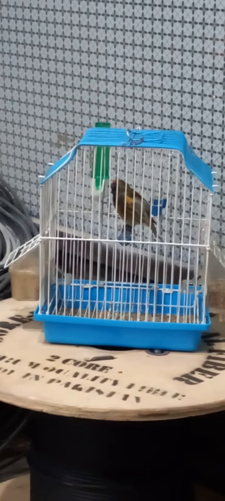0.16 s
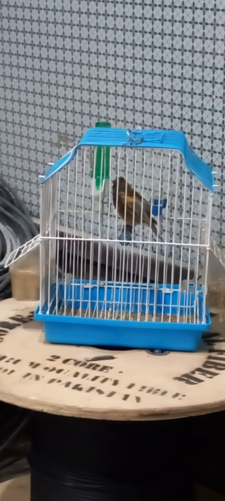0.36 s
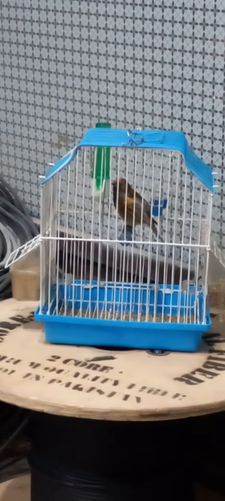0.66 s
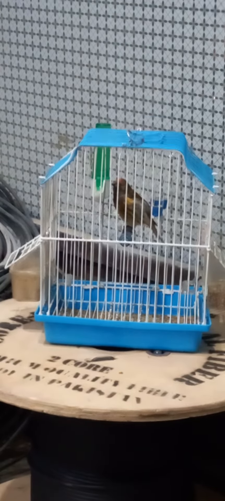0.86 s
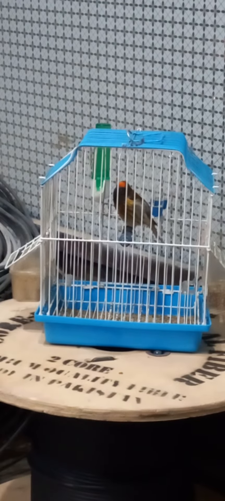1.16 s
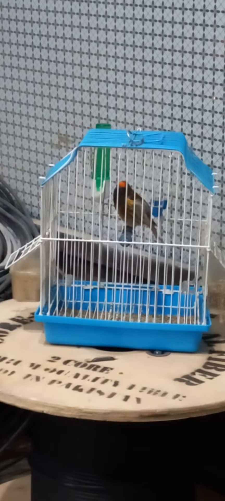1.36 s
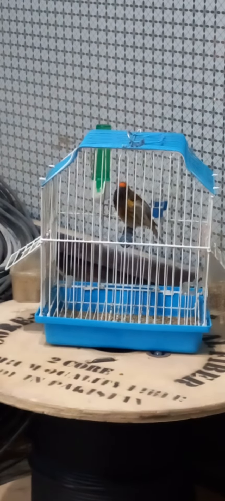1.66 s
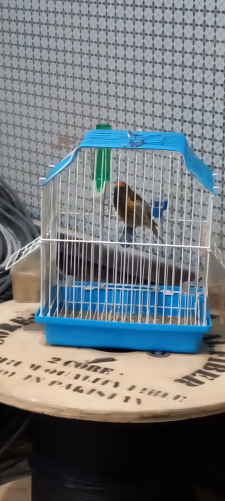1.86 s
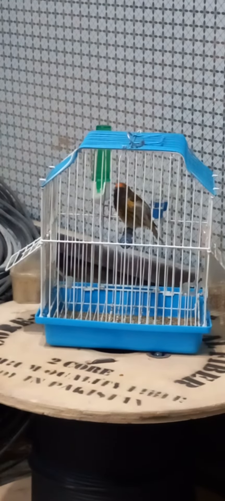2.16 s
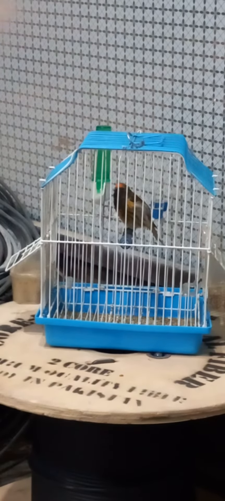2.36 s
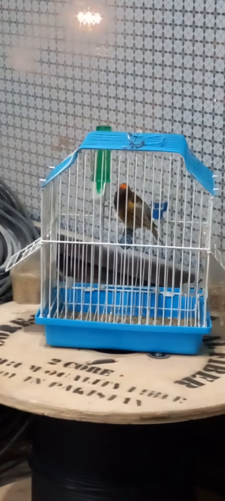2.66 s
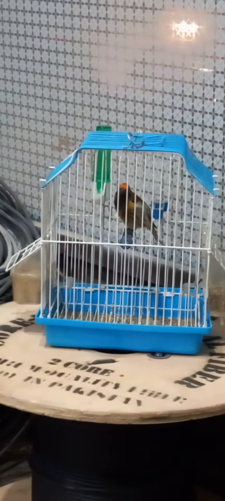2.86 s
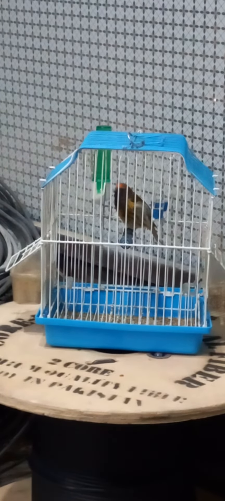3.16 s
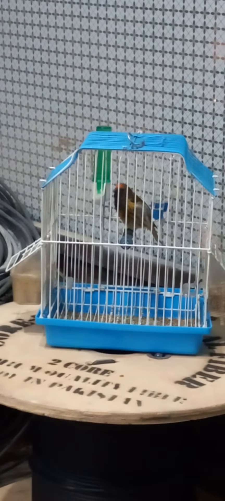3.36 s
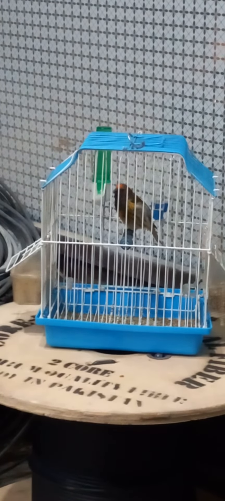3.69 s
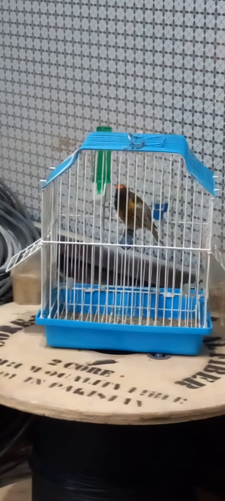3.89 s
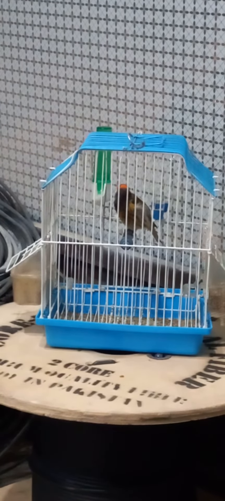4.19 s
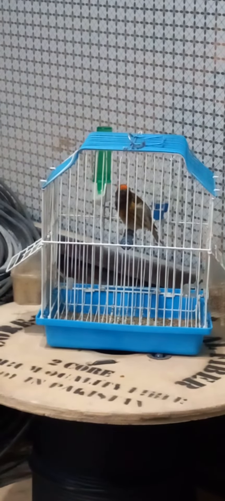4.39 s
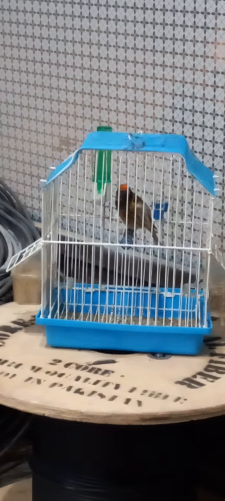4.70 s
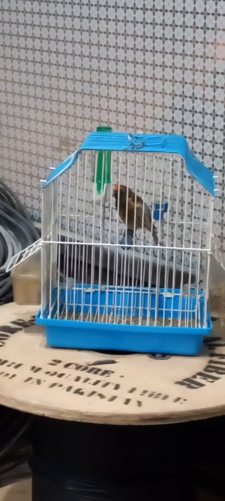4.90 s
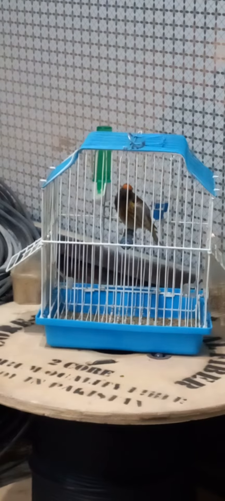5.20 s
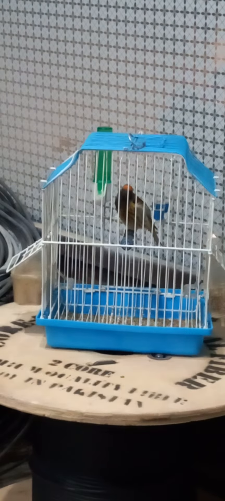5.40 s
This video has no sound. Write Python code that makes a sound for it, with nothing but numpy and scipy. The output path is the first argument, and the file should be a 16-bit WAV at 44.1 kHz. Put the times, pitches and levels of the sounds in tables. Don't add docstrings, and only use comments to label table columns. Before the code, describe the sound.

Close caged-bird twittering, fast and bright, with doubled whistles, chirps, buzzy ticks and squeaks, ringing in a hard-walled yard. Beneath it lie a quiet low traffic rumble, wavering engine tones and a soft airy hiss. The song thickens and gets louder until a pinched trill, ends at about four and a half seconds, then far birds call weakly. Stereo phone pickup, bird leaning right.

```python
import sys
import numpy as np
from scipy import signal
from scipy.fft import rfft, irfft, next_fast_len
from scipy.io import wavfile
from scipy.ndimage import uniform_filter1d, minimum_filter1d

SR = 44100
rng = np.random.default_rng(int(sys.argv[2]) if len(sys.argv) > 2 else 0)


def amplitude_ratio(level_db):
    exponent = np.asarray(level_db, float) / 20
    return 10 ** exponent


def unload_wav(signal):
    wavfile.write(
        sys.argv[1],
        SR,
        np.round(np.clip(np.atleast_2d(signal).T, -1, 1) * 32767).astype(np.int16),
    )


N = 244314


def rms_one(x):
    return x / np.sqrt(np.mean(x ** 2) + 1e-20)


def at_hz(points, hz):
    point_hz, value = np.array(points).T
    return np.interp(np.log(np.maximum(hz, 1)), np.log(point_hz), value)


def in_time(rows):
    s, *columns = np.transpose(rows)
    return [np.interp(np.arange(N) / SR, s, c) for c in columns]


def drift(rate_hz, size):
    r = np.exp(-2 * np.pi * rate_hz / SR)
    settle = 8000
    wander = signal.lfilter([1], [1, -2 * r, r * r], rng.standard_normal(size + settle))
    return rms_one(wander[settle:])


def coloured(x, spectrum):
    size = next_fast_len(x.shape[-1])
    hz = np.arange(size // 2 + 1) * SR / size
    return irfft(rfft(x, size) * amplitude_ratio(at_hz(spectrum, hz)), size)[..., :x.shape[-1]]


def band_noise(low_hz, high_hz, order, noise):
    return signal.sosfilt(signal.butter(order, [low_hz, high_hz], "band", fs=SR, output="sos"), noise)


# frequency in Hz, likeness from -1 to 1.
LIKENESS = [(60, .955), (180, .99), (550, .33), (1650, -.054), (4970, -.12), (15000, -.5)]


def stereo_noise(spectrum, low_hz, high_hz):
    size = next_fast_len(N)
    hz = np.arange(size // 2 + 1) * SR / size
    mid, side = rfft(rng.standard_normal((2, size)))
    alike = np.clip(at_hz(LIKENESS, hz), -1, 1)
    edges = np.sqrt((1 + (low_hz / (hz + 1)) ** 16) * (1 + (hz / high_hz) ** 16))
    band = amplitude_ratio(at_hz(spectrum, hz)) / edges
    ears = band * (np.sqrt(1 + alike) * mid + np.sqrt(1 - alike) * side * [[1], [-1]])
    return rms_one(irfft(ears, size)[:, :N])


def whistles(notes, rise_bend, fall_bend, swell, wobble, flutter_db):
    tones, overtones = np.zeros((2, N + SR))
    unsteady = np.array([drift(750, N + SR), drift(180, N + SR), drift(1900, N + SR)])
    for s, length, first_hz, last_hz, level_db, step_db in notes:
        at, size = round(s * SR), round(length * SR)
        q = np.linspace(0, 1, size)
        harsh = amplitude_ratio(min(step_db, 0))
        pitch, loud, rasp = unsteady[:, at:at + size]
        glide = 1 - (1 - q) ** rise_bend if last_hz > first_hz else q ** fall_bend
        hz = first_hz + (last_hz - first_hz) * glide
        hz = hz * (1 + wobble * (harsh / 2 + 0.089) * pitch)
        phase = 2 * np.pi * np.cumsum(hz) / SR
        flutter = flutter_db * (harsh / 2 + 1.01) * np.tanh(loud)
        shape = np.abs(np.sin(np.pi * q ** swell)) ** 0.58 * amplitude_ratio(level_db + flutter)
        tones[at:at + size] += shape * np.sin(phase)
        shape = shape * np.sqrt(np.abs(np.sin(np.pi * q)))
        shape = shape * (1 + 0.4 * harsh ** 2 * np.tanh(rasp))
        for k in range(2, 12 if step_db > -12 else 5):
            level = amplitude_ratio(min(step_db, 5) * (k - 1) - 0.82 * (k - 1) ** 2)
            below_top = k * hz < 0.4 * SR
            overtones[at:at + size] += shape * level * np.sin(k * phase + k * k) * below_top
    return tones[:N], overtones[:N]


# start in seconds, length in seconds, middle pitch in Hz, level in dB, step down to each overtone in dB.
LEVEL_NOTES = [(0, 0.012, 3550, -45, -19), (0, 0.03, 5494, -41.5, -14), (.344, 0.016, 3390, -40, -12.5),
               (.399, 0.02, 4286, -39.5, -28), (.592, 0.02, 4700, -46.5, -17),
               (.594, 0.035, 3576, -46.5, -8), (1.156, 0.025, 4600, -34.5, -40),
               (1.206, 0.031, 5270, -34, -15.5), (2.116, 0.027, 4424, -31, -27),
               (2.163, 0.017, 6780, -31, -6), (2.372, 0.029, 3603, -26, -48),
               (3.149, 0.039, 4944, -34, -35), (3.208, 0.029, 3846, -34.5, -18),
               (3.214, 0.03, 5500, -39, -21), (3.401, 0.054, 3180, -49.5, -30),
               (3.451, 0.02, 3680, -36, -9), (3.524, 0.028, 4288, -30, -39), (3.652, 0.017, 3650, -32, -30),
               (3.94, 0.034, 1413, -28, -26), (4.333, 0.018, 5720, -32, -33),
               (4.312, 0.0063, 6870, -36, -40), (4.458, 0.0093, 5090, -30, -17),
               (4.522, 0.022, 6220, -30, -33), (3.774, 0.0073, 3186, -32, -25),
               (3.78, 0.019, 3074, -26.5, -38), (3.72, 0.018, 2278, -38, -28),
               (4.76, 0.012, 3490, -49, -23)]
LIFTS = [(0, 0.012, 4940, -40, -27), (.206, 0.023, 3590, -39, -17), (.399, 0.054, 3760, -47.5, -15),
         (1.159, 0.04, 3580, -40.5, -11), (1.21, 0.019, 3405, -38.5, -22), (1.482, 0.046, 4720, -28, -37),
         (1.504, 0.034, 2860, -34.5, -37), (1.508, 0.016, 2337, -41.5, -3),
         (1.559, 0.021, 3485, -36.5, -36), (1.69, 0.027, 3960, -37.5, -31), (2.003, 0.021, 1480, -34.5, 2),
         (2.163, 0.037, 2640, -46.5, -7), (2.168, 0.015, 3444, -33.5, -19), (2.165, 0.033, 5355, -36, -27),
         (2.538, 0.024, 2710, -32, -15), (1.61, 0.024, 5184, -30, -11), (2.712, 0.019, 3045, -34.5, -34),
         (2.88, 0.028, 3630, -43.5, -6), (3.15, 0.021, 3780, -33.5, -40), (3.443, 0.029, 4750, -24, -47),
         (3.993, 0.018, 4200, -25.5, -7), (4.504, 0.017, 5875, -34, -20), (3.666, .036, 3952, -23.5, -37),
         (2.88, .022, 4950, -25.5, -32), (3.884, 0.029, 4627, -34, -13), (4.328, 0.051, 2865, -30, -15),
         (4.33, 0.012, 4076, -29, -30), (4.454, 0.018, 5940, -32.5, -19)]
RISES = [(.021, 0.028, 4506, -36, -23), (.654, 0.034, 5054, -30, -26), (.656, 0.023, 3940, -37, -16),
         (1.021, 0.038, 5200, -28, -22), (1.023, 0.027, 3993, -31.5, -20), (1.51, 0.029, 5090, -32, -35),
         (2.116, 0.029, 3520, -34.5, -14), (2.466, 0.019, 3970, -36.5, -23), (2.44, 0.024, 3670, -39, -30),
         (3.944, 0.017, 2630, -39, 6), (2.536, 0.036, 5140, -37.5, -27), (2.567, 0.0097, 5667, -28.5, -36),
         (3.717, 0.025, 6110, -32.5, -39), (2.873, 0.011, 4730, -34, -17), (2.934, 0.0402, 3710, -33, -47),
         (2.945, 0.034, 1830, -45.5, -25), (3.266, 0.019, 4400, -29, -17), (3.497, 0.022, 2896, -34, -34),
         (3.895, 0.015, 3590, -37.5, -20), (4.304, 0.017, 1844, -32, -8), (4.497, 0.035, 3825, -24.5, -46),
         (4.406, 0.033, 5070, -24, -32), (4.454, 0.015, 3007, -33, -18)]
CHIRPS = [(.322, 0.039, 3983, -36.5, -36), (1.27, 0.026, 4454, -28, -19), (1.365, 0.033, 4680, -26.5, -32),
          (1.988, 0.0203, 1333, -43.5, 2), (2.565, 0.019, 1460, -32.5, -0.5),
          (2.706, 0.0234, 5390, -28, -19.5), (2.932, 0.03, 5200, -23, -54), (3.313, 0.025, 4155, -25, -27),
          (3.404, 0.023, 3924, -29, -25), (3.716, 0.019, 2106, -46, 5.5), (3.751, 0.012, 5340, -37, -30),
          (3.932, .017, 2490, -34.5, 5.5)]
DROPS = [
    (1.449, 0.014, 2580, -43, -1.5),
    (1.776, 0.0074, 5330, -29.5, -15),
    (3.6, 0.0088, 5080, -32, -23),
]


def gliding_notes():
    kinds = [(LEVEL_NOTES, 0.97), (LIFTS, 1.047), (RISES, 1.09), (CHIRPS, 1.18), (DROPS, 0.79)]
    notes = []
    for rows, glide in kinds:
        half = np.sqrt(glide)
        notes += [(s, length, hz / half, hz * half, db, step) for s, length, hz, db, step in rows]
    return notes


# start in seconds, length in seconds, lowest Hz, highest Hz, level in dB.
RASPS = [(0.233, 0.0097, 1490, 3600, -37), (1.235, 0.013, 1690, 3540, -41),
         (1.769, 0.021, 2900, 7600, -32.5), (1.771, 0.03, 1260, 1800, -31.5),
         (0.218, 0.029, 1280, 2120, -40.5), (0.845, .03, 3160, 5400, -41), (0.904, .03, 3150, 5560, -40.5),
         (1.505, 0.019, 2200, 5370, -44), (1.762, 0.023, 11100, 15600, -49),
         (1.843, .025, 10900, 15400, -48.5), (1.99, 0.04, 11100, 15100, -45),
         (2.563, .02, 11000, 15500, -56), (4.493, 0.029, 3000, 4240, -39),
         (1.862, 0.018, 2500, 5540, -37.5), (2.169, 0.027, 2500, 5540, -36),
         (0.601, 0.017, 2600, 15200, -56), (3.161, .01, 2400, 15000, -57), (2.355, 0.0091, 3200, 5400, -38),
         (2.4, 0.013, 1970, 4170, -34), (2.476, 0.03, 1900, 5470, -34), (3.611, 0.0071, 4370, 7600, -28),
         (3.725, 0.022, 3640, 7000, -29.5), (3.764, 0.019, 3670, 5800, -29), (4.322, 0.02, 3220, 6840, -32),
         (4.455, 0.026, 2510, 6060, -32)]


def rasps():
    out = np.zeros(N + SR)
    for s, length, low_hz, high_hz, level_db in RASPS:
        at, size = round(s * SR), round(length * SR)
        puff = rms_one(band_noise(low_hz, high_hz, 3, rng.standard_normal(SR // 10)))
        out[at:at + size] += amplitude_ratio(level_db) * np.sqrt(np.hanning(size)) * puff[-size:]
    return out[:N]


# start in seconds,
# length in seconds, first pitch in Hz, last pitch in Hz, level in dB.
SWEEPS = [(0.22, 0.0089, 3640, 1690, -34.5), (1.176, 0.0092, 4760, 3520, -40),
          (1.221, 0.0087, 3494, 1900, -43), (1.856, 0.0066, 5820, 4520, -27.5),
          (2.179, 0.013, 3490, 5220, -23.5), (2.189, 0.0082, 5150, 4020, -28),
          (3.385, .011, 7530, 7720, -42), (2.336, 0.011, 2420, 3420, -39.5),
          (2.354, 0.013, 3330, 4320, -31), (2.366, 0.009, 4420, 3620, -28.5),
          (2.468, 0.0164, 2963, 2020, -40.5), (2.73, 0.019, 5170, 4770, -26.5),
          (3.104, 0.009, 4280, 2210, -43), (3.17, 0.011, 4940, 4250, -53), (3.591, 0.0047, 5850, 5940, -46)]
REEDY_SWEEPS = [(1.499, 0.017, 4100, 3200, -48), (2.362, 0.0094, 4280, 5430, -32.5),
                (2.466, 0.016, 4510, 5970, -41.5), (2.483, 0.014, 5960, 4330, -35),
                (3.205, 0.026, 4540, 5664, -29.5), (3.372, 0.0091, 4440, 5060, -31),
                (3.378, 0.01, 4760, 7700, -27.5), (3.76, 0.013, 5850, 4000, -24.5),
                (3.662, 0.0097, 2860, 3900, -30), (4.302, 0.01, 5390, 5800, -33),
                (4.308, 0.0079, 5860, 4900, -33), (4.47, 0.015, 3680, 3950, -30.5)]
HARSH_SWEEPS = [
    (1.765, 0.013, 890, 1070, -44),
    (1.772, 0.0104, 1550, 1210, -45.5),
    (1.847, 0.013, 1217, 1342, -42),
    (1.853, 0.0128, 1358, 1448, -37),
    (1.86, 0.0121, 1505, 1080, -39),
    (3.604, 0.014, 2826, 2100, -37.5),
    (1.603, 0.015, 4260, 5340, -35.5),
]
PURE_STEP_DB = -70


def sweeps():
    kinds = [(SWEEPS, PURE_STEP_DB), (REEDY_SWEEPS, -20), (HARSH_SWEEPS, 2)]
    return [(*row, step_db) for rows, step_db in kinds for row in rows]


def repeated(syllables, strokes):
    return [(s + delay, length, first, last, db, step) for s, *levels in syllables
            for db, (delay, length, first, last, step) in zip(levels, strokes)]


# start in seconds, upstroke in dB, downstroke in dB, landing in dB.
RATTLE = [
    (.72, -27.5, -35.5, -40),
    (.777, -34.5, -33.5, -42),
    (.829, -29, -32.5, -47),
    (.887, -27, -36, -37.5),
]
# delay in seconds, length in seconds, first Hz, last Hz, overtone step in dB.
RATTLE_STROKES = [
    (-.002, 0.0171, 4780, 5440, -8.5),
    (0.0103, 0.016, 5486, 3390, 0),
    (0.022, .012, 4100, 3835, -17),
]


def rattle():
    return repeated(RATTLE, RATTLE_STROKES)


# start in seconds, whistle in dB, its sagging end in dB, falling squeak in dB,
# harsh opening tick in dB.
TRILL = [
    (3.993, -63, -49, -33.5, -51),
    (4.044, -23.5, -45, -29, -43),
    (4.094, -25.5, -29.5, -29, -49),
    (4.147, -25.5, -31, -32, -48.5),
    (4.197, -25, -46, -50, -41),
    (4.25, -25, -32, -39, -43),
]
# delay in seconds, length in seconds, first Hz, last Hz, overtone step in dB.
TRILL_STROKES = [
    (0, 0.019, 3860, 4060, -21),
    (0.0155, 0.0167, 4200, 3900, -29),
    (0.02, 0.0085, 8350, 6250, -42),
    (-0.003, 0.0055, 2500, 3000, -0.5),
]
# multiple of its pitch, level in dB against the whistle.
TRILL_OVERTONES = [
    (3, -16.5),
    (4, -21),
]


def trill():
    notes = repeated(TRILL, TRILL_STROKES)
    delay, length, first, last, _ = TRILL_STROKES[0]
    for s, db, *_ in TRILL:
        notes += [(s + delay, length, first * round(k), last * round(k), db + under_db, PURE_STEP_DB)
                  for k, under_db in TRILL_OVERTONES]
    return notes


# frequency in Hz, level in dB.
BEAK = [(1000, -42), (1500, -27.5), (1900, -5.5), (2800, -1), (4500, 5), (6500, 1.5), (8500, -3.5),
        (11000, 5), (13000, 4), (14500, 4), (16000, 24.5)]
# frequency in Hz, level in dB.
OVERTONE_COLOUR = [(2000, 0), (4000, 7), (6000, 5.5), (8000, 1), (9500, 1), (11500, -1), (14000, -15),
                   (16000, -6)]
# frequency in Hz, level in dB.
BREATH = [(1500, -44), (3000, -40), (6000, -48), (8000, -46), (10500, -39), (16000, -38)]


def finch():
    notes = gliding_notes() + sweeps() + rattle() + trill()
    flow, overtones = whistles(notes, rise_bend=1.508, fall_bend=1.226, swell=0.91, wobble=0.026,
                               flutter_db=4.0)
    strength = np.sqrt(uniform_filter1d(flow ** 2, size=161) * 2 + 1e-12)
    effort = -minimum_filter1d(-strength, size=881)
    unit = np.clip(flow / effort, -1.6, 1.6)
    bent = amplitude_ratio(-35.5) * unit ** 2 + amplitude_ratio(-8.5) * unit ** 3 + amplitude_ratio(-13.5) * unit ** 4
    hiss = coloured(strength * rng.standard_normal(N), BREATH)
    throat = flow + effort * bent + coloured(overtones, OVERTONE_COLOUR)
    return coloured(throat + hiss + rasps(), BEAK)


# frequency in Hz, time to fade by 60 dB in seconds.
YARD_T60 = [(1500, 0.79), (2700, 0.49), (4000, 0.43), (8000, 0.38), (15000, 0.27)]


def yard(x, slow_db, slow_s, near_db, near_s):
    t = np.arange(SR) / SR
    edges = 900 * 2 ** np.arange(0, 4.3, 0.5)
    white, echoes = rng.standard_normal((2, SR)), 0
    for low, high in zip(edges, edges[1:]):
        fade = amplitude_ratio(-60 * t / at_hz(YARD_T60, np.sqrt(low * high)))
        echoes = echoes + band_noise(low, high, 2, white) * fade
    slow = amplitude_ratio(slow_db) * np.exp(-t / slow_s)
    near = amplitude_ratio(near_db) * np.exp(-t / near_s)
    echoes = echoes * np.minimum(t / 0.0032, 1) * (1 + slow + near)
    echoes = echoes / np.sqrt(np.sum(echoes ** 2) / 2)
    return signal.fftconvolve(x[None], echoes, axes=1)[:, :N]


# time in seconds, level in dB, brightening in dB per octave as tyres pass nearer.
TRAFFIC = [(0, -51, -1), (.34, -49, -4.5), (1.28, -49.5, -0.5), (1.54, -50, -3.5), (2.11, -53, 6),
           (2.75, -55, -1), (3.13, -65, 7.5), (3.26, -56, -0.7), (3.5, -60.5, 2), (4.07, -50, 1),
           (4.41, -50, -0.6), (4.77, -55, 1), (5.54, -56, 3.5)]
# frequency in Hz, level in dB per Hz.
RUMBLE = [(18, -37), (42, -22), (60, -3), (118, -0.5), (181, -11), (237, -3), (351, -11.5), (392, -16.5),
          (670, -25), (1040, -36.5), (1300, -29), (1690, -69), (2860, -120)]
# share in dB, octaves from the middle.
ROAD_LAYERS = [
    (0.5, -0.5),
    (4.5, 0.14),
    (1.5, 0.09),
    (-8, 1.43),
]


def traffic():
    edges_hz = [10, 90, 190, 400, 1150]
    level_db, bright_db = in_time(TRAFFIC)
    road = 0
    for (share_db, octaves), low, high in zip(ROAD_LAYERS, edges_hz, edges_hz[1:]):
        layer_db = level_db + share_db + octaves * bright_db + 1.8 * drift(3.55, N)
        road = road + amplitude_ratio(layer_db) * stereo_noise(RUMBLE, low, high)
    return road


# time in seconds, level in dB.
TYRE_WHINE = [(0, -72), (.3, -67.5), (.75, -68.5), (1.4, -60.5), (1.6, -69.5), (2.1, -66), (2.6, -79.5),
              (4.2, -70), (5.54, -80)]


def tyre_whine():
    level_db = in_time(TYRE_WHINE)[0] + 1.9 * drift(3.6, N)
    return amplitude_ratio(level_db) * stereo_noise(RUMBLE, 680, 610)


# time in seconds, level in dB.
AIR_DB = [(0, -70), (.6, -69), (1.1, -64), (1.5, -63), (2.3, -61), (3, -66), (3.5, -61), (3.8, -53.5),
          (4.6, -57.5), (5.54, -61.5)]
# frequency in Hz, level in dB per Hz.
AIR = [(590, -42), (1000, -0.5), (2280, 0), (3190, -1), (4620, -3), (5020, -5.5), (5900, -4), (8960, -20.5),
       (16000, -20)]


def background_air():
    return amplitude_ratio(in_time(AIR_DB)[0]) * stereo_noise(AIR, 1260, 16000)


# time in seconds, pitch in Hz, level in dB.
ENGINE_DEEP = [
    (0.0, 64, -75),
    (0.68, 68, -56),
    (2.46, 68, -57),
    (2.56, 64.1, -45),
    (3.0, 62, -43),
]
ENGINE_NOTES = [
    [(.12, 334, -51), (.4, 337, -49.5), (.64, 337, -42.5)],
    [(1.28, 356.4, -47.5), (1.8, 361.4, -50), (2.27, 369, -47)],
    [(1.15, 245, -40.5), (1.5, 256.2, -57.5), (1.9, 261.3, -46)],
    [(1.8, 434, -60), (2.1, 450, -60.5), (2.5, 480, -54)],
]
ENGINE_MID = [
    [(0.3, 103, -64), (1.254, 122, -33.5), (1.4, 109, -76)],
    [(1.6, 106, -54), (2.012, 132, -43.5), (2.9, 112, -50.5)],
    [(3.9, 106, -48), (4.068, 126, -41.5), (4.75, 133, -38.5)],
]
ENGINE_LOW = [
    (0.45, 145.2, -64),
    (0.664, 157.0, -40),
    (1.45, 157.3, -43.5),
]
ENGINE_LATE = [
    (3.75, 239.3, -50),
    (4.044, 229.2, -39),
    (4.65, 240, -49),
]


def engine_note(rows, waver_db):
    hz, db = in_time(rows)
    t = np.arange(N) / SR
    fade = np.clip(np.minimum(t - rows[0][0], rows[-1][0] - t) / 0.091, 0, 1)
    level = amplitude_ratio(db - 3.0 + waver_db * drift(3.3, N))
    return fade * level * np.sin(2 * np.pi * np.cumsum(hz) / SR)


def engines():
    every_note = [*ENGINE_NOTES, *ENGINE_MID, ENGINE_DEEP, ENGINE_LOW, ENGINE_LATE]
    return sum(engine_note(rows, waver_db=1.5) for rows in every_note)


# time in seconds, level in dB.
PASSING_HISS = [
    (1.8, -95),
    (2.0, -71),
    (2.2, -65),
    (2.4, -95),
]


def passing_hiss():
    return amplitude_ratio(in_time(PASSING_HISS)[0]) * stereo_noise(AIR, 700, 1450)


# start in seconds, length in seconds, first pitch in Hz, last pitch in Hz, level in dB.
FAR_NOTES = [
    (4.69, 0.048, 1820, 1760, -89),
    (4.87, 0.027, 3500, 3450, -72),
    (5.13, .056, 6000, 6000, -65),
    (5.231, 0.026, 6030, 5850, -55),
    (5.344, 0.027, 4620, 4700, -55),
    (5.396, 0.053, 3900, 4030, -54.5),
    (5.451, 0.034, 4620, 4800, -55),
    (5.494, .022, 5000, 5150, -52),
]


def far_birds():
    notes = [(*row, -16) for row in FAR_NOTES]
    return sum(whistles(notes, rise_bend=1.4, fall_bend=0.51, swell=0.18, wobble=0.01, flutter_db=11.5))


def scene():
    bird = finch()
    far = far_birds()
    direct = amplitude_ratio(np.array([[-13], [-4.5]])) * bird
    echoes = yard(bird + far, slow_db=17.0, slow_s=0.36, near_db=0.0, near_s=0.012)
    walls = amplitude_ratio(np.array([[-4], [-5]])) * echoes
    road = traffic() + tyre_whine() + passing_hiss()
    return direct + walls + road + engines() + background_air()


def roll_off(x):
    return signal.sosfilt(signal.butter(12, 15850, fs=SR, output="sos"), x)


# frequency in Hz, level in dB.
LEFT_PORT = [(700, -0.45), (3000, 1.5), (14000, -2)]


def record(dry):
    ports = np.array([coloured(dry[0], LEFT_PORT), np.roll(dry[1], shift=2)])
    ports = signal.sosfilt(signal.butter(3, 52, "high", fs=SR, output="sos"), ports)
    ports = signal.sosfilt(signal.cheby2(12, 60, 16300, fs=SR, output="sos"), ports)
    return roll_off(ports)


dry = scene()
out = record(dry)
unload_wav(out)
```